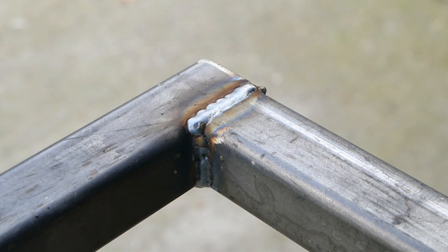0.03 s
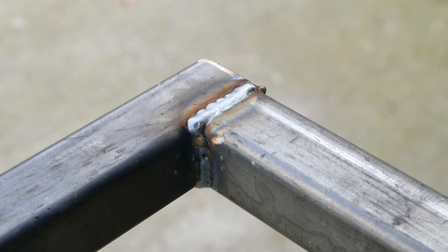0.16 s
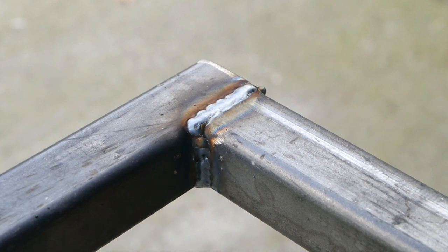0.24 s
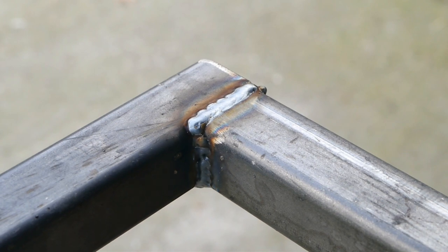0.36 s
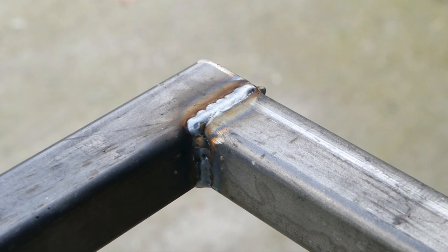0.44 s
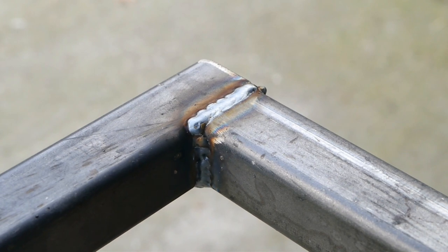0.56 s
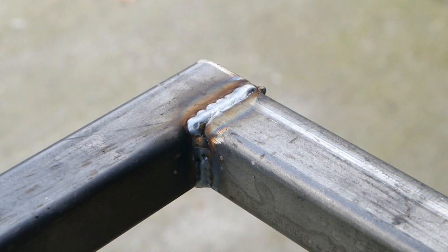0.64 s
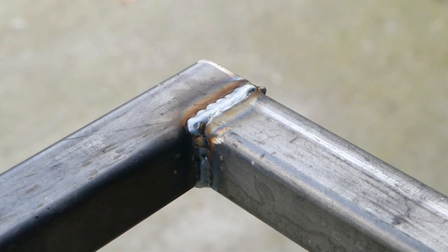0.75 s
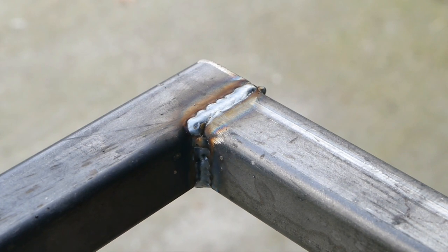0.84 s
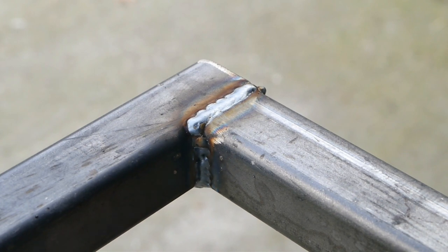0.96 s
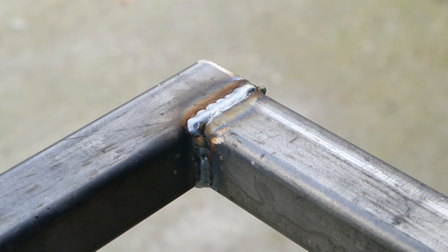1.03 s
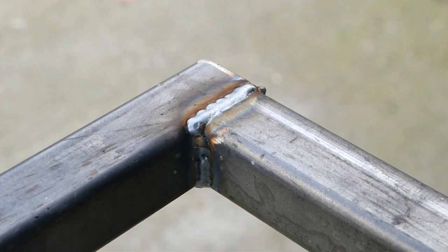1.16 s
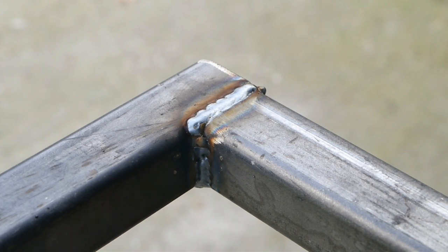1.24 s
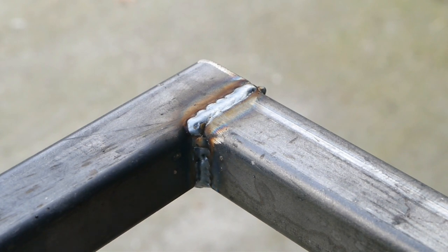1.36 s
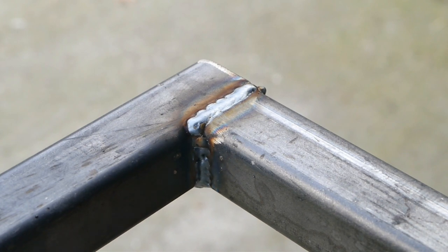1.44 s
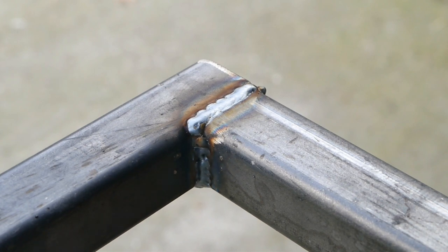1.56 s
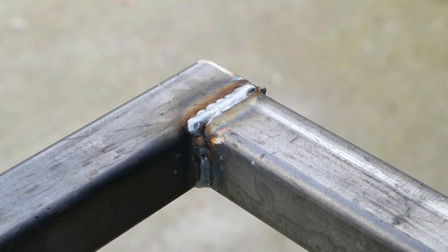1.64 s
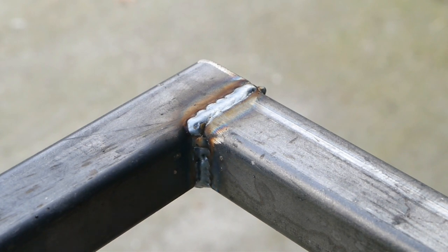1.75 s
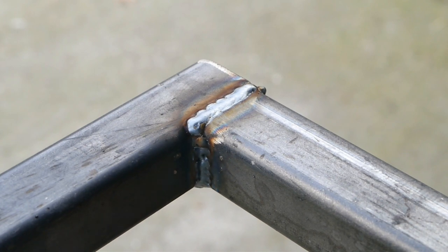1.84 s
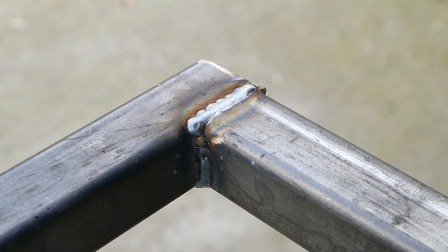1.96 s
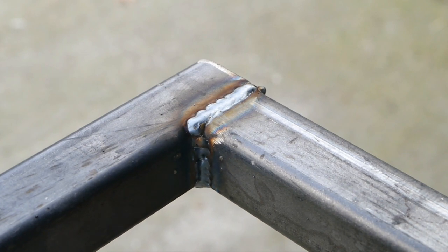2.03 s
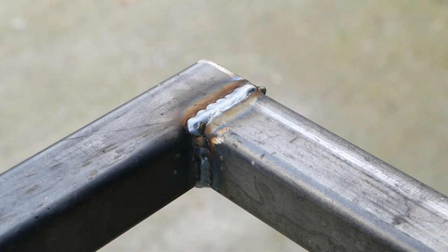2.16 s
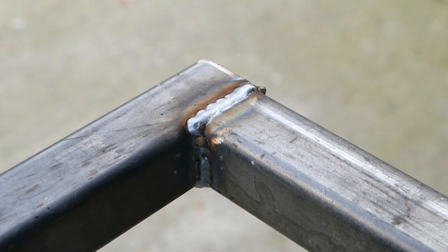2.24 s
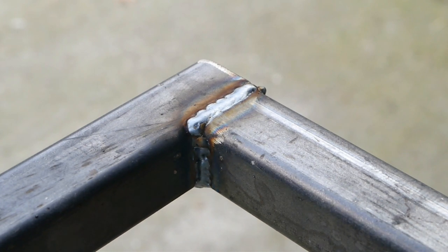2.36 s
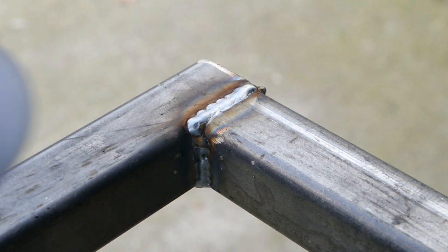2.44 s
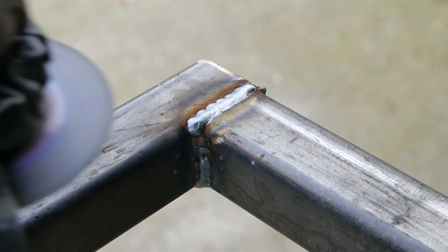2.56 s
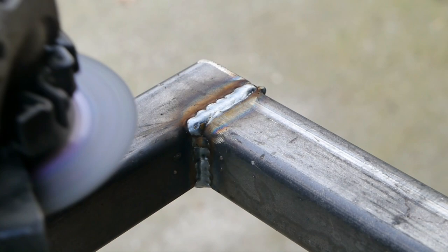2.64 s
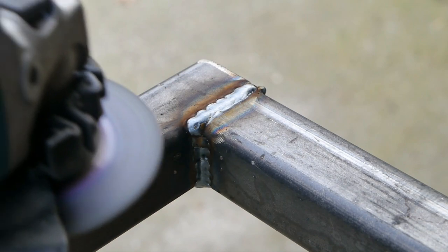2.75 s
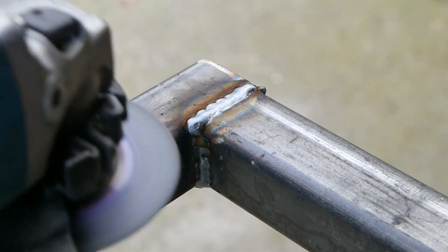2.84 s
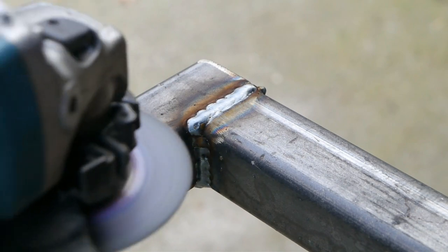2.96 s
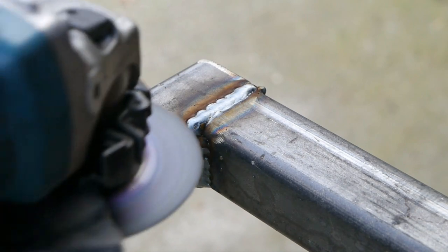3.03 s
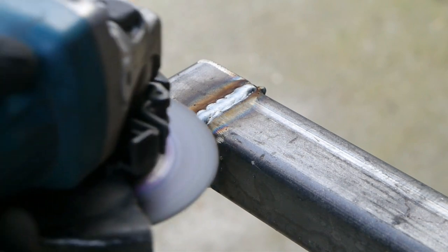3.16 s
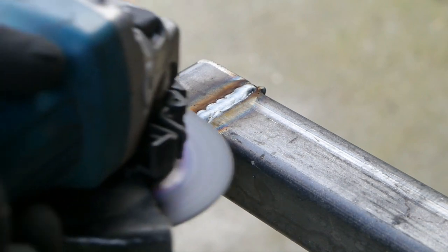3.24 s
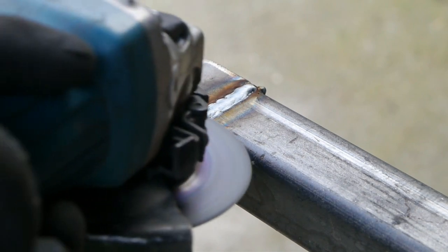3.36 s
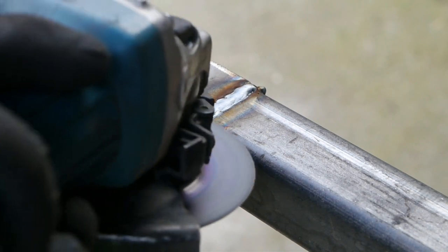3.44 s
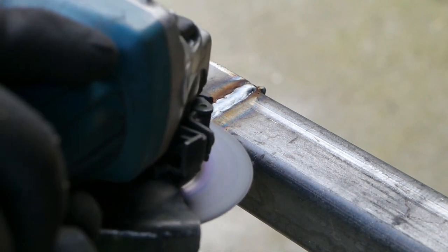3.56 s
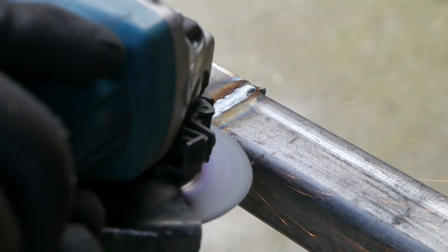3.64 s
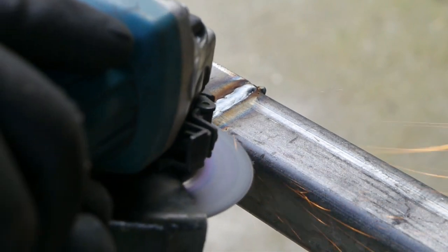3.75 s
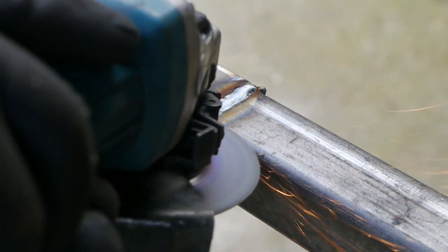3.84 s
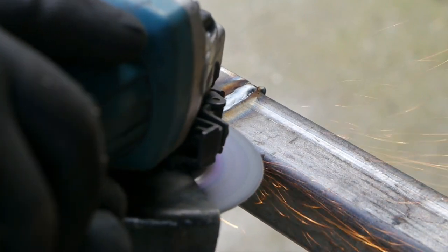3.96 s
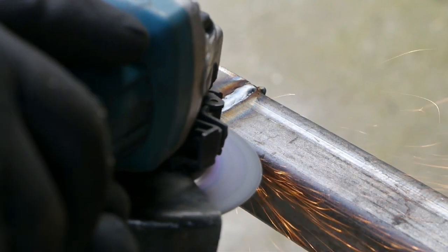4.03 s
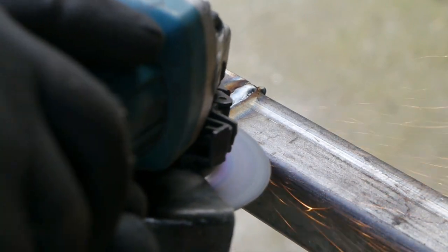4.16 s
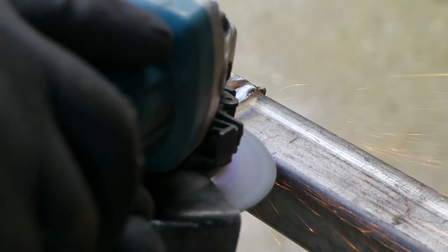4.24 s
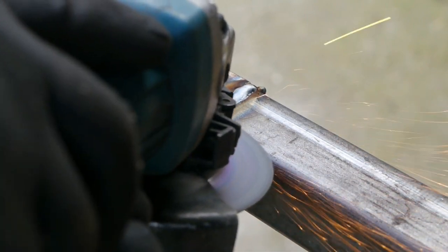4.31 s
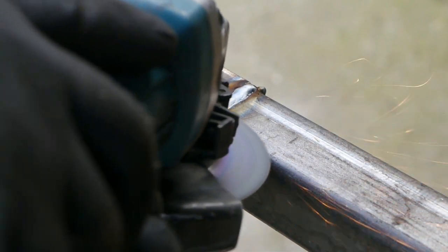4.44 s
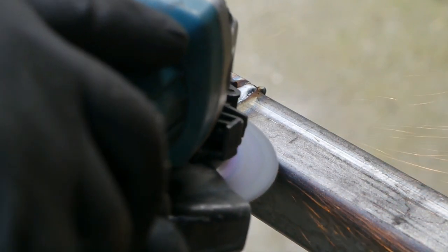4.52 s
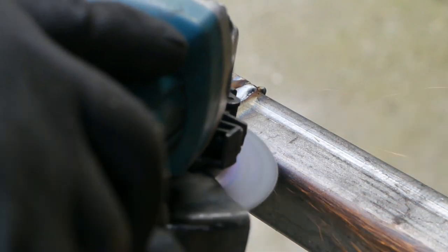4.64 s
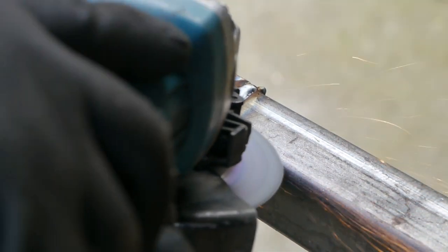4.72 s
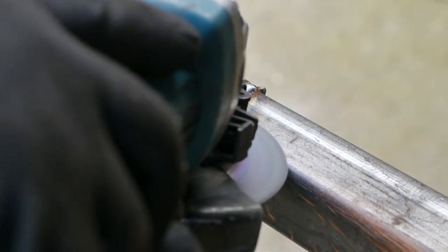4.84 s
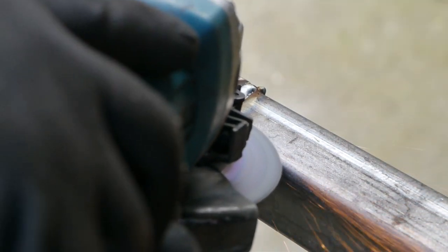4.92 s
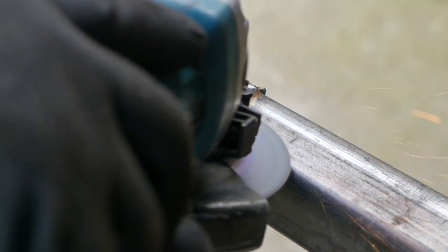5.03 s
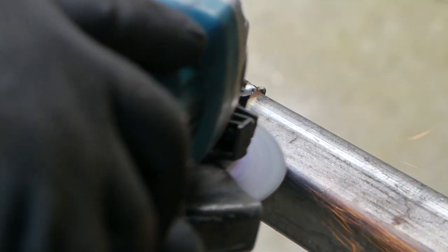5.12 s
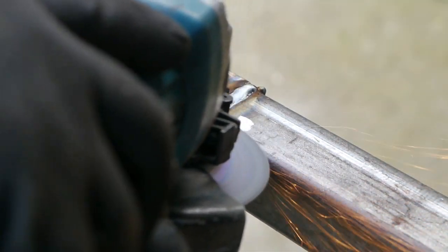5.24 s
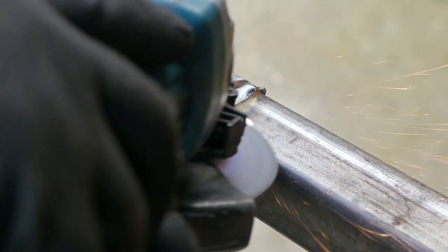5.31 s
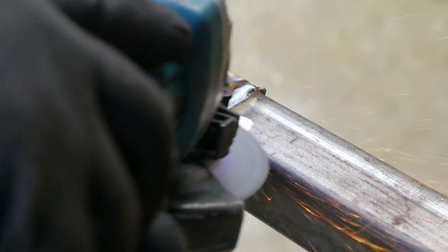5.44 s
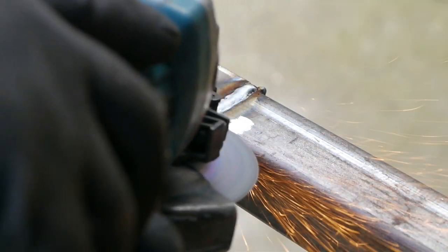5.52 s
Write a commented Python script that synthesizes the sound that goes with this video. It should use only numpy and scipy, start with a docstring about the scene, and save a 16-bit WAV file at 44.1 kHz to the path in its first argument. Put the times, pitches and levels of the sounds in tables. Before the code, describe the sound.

In a quiet open yard, an angle grinder is handled close to stereo microphones with small knocks, rubs and clicks. A sharp switch clack starts it; it jolts up into a rushing, rattling whine, then bites a steel weld with stuttering contacts and a loud, bright, sustained rasp.

```python
"""An angle grinder bites a weld bead on a steel tube: the same slowly wearing grit passes once a turn,
so the rasp is a comb of lines that sags under load, and single lines sing out as chatter.
Before that the tool is picked up with knocks, rubs and ticks, switched on, spins up and is carried to the bead.
Its fan rushes (shaped noise), its gears rattle (resonances swept by the tooth rate), its shaft hums and its
commutator whines (sines). The disc bounces before it settles. Open yard, near microphones."""
import sys
import numpy as np
from scipy import signal
from scipy.fft import rfft, irfft
from scipy.io import wavfile
from scipy.ndimage import uniform_filter1d, map_coordinates

SR = 44100
rng = np.random.default_rng(int(sys.argv[2]) if len(sys.argv) > 2 else 0)


def to_wav(s):
    """Save 16-bit WAV."""
    ch = np.atleast_2d(s).T  # columns
    pcm = np.round(np.clip(ch, -1, 1) * 32767)  # PCM
    wavfile.write(sys.argv[1], SR, pcm.astype(np.int16))


N = 246059
T = np.arange(N) / SR
GEAR_RATIO = 3.68  # motor turns per disc turn
BITE_S = 3.62  # the disc first touches the weld
# pressure on the bead: t/s, relative rasp level/dB, relative tube level against the rasp/dB
PRESSURE = [(3.79, -29, -3), (3.848, -19, -7.5), (3.878, -24.5, -9.5), (4.148, -19.5, -10),
            (4.452, -21, -8.5), (4.492, -19, -5.5), (4.526, -19, -10.5), (4.64, -20, -14.5),
            (4.68, -25, -7), (4.8, -21, -3), (4.82, -18.5, -8.5), (4.87, -23, -4), (5.098, -19.5, -4),
            (5.244, -23.5, -7), (5.322, -21, -2), (5.432, -18, -10.5), (5.538, -22, -9.5), (5.58, -18, -10)]


def undb(db):
    """Decibels to gain."""
    return 10 ** (np.asarray(db) / 20)


def unit(x):
    """Scale to rms 1."""
    return x / np.sqrt(np.mean(x ** 2))


def curves(rows):
    """The columns of a table, joined by straight lines in time."""
    s, *columns = np.transpose(rows)
    return [np.interp(T, s, c) for c in columns]


def colour(x, points):
    """Filter by a spectrum of (Hz, dB) points on a logarithmic frequency axis; rms 1."""
    hz, db = np.transpose(sorted(points))
    size = 2 ** 18
    f = np.maximum(np.fft.rfftfreq(size, 1 / SR), 1)
    gain = undb(np.interp(np.log(f), np.log(hz), db))
    return unit(irfft(rfft(x, size) * gain)[..., :N])


def resonate(x, hz, width_hz):
    """One resonance, gain 1 at its centre."""
    b, a = signal.iirpeak(min(hz, SR / 2 - 1), hz / min(width_hz, SR / 4), fs=SR)
    return signal.lfilter(b, a, x)


def ring(x, modes):
    """A set of (Hz, width Hz, dB) modes, each at its own rms level."""
    return sum(undb(db) * unit(resonate(x, hz, width)) for hz, width, db in modes)


def side_of(x, hz, kind):
    """Low or high part of a sound."""
    return signal.sosfilt(signal.butter(2, hz, kind, fs=SR, output="sos"), x)


def spread(pair, side_db, pan_db=0):
    """Two unrelated sounds as middle and side of one source; pan is left minus right."""
    mid, side = pair[0], undb(side_db) * pair[1]
    return np.array([(mid + side) * undb(pan_db / 2), (mid - side) * undb(-pan_db / 2)])


def noise(side_db, pan_db=0, split_hz=1400):
    """Stereo noise whose long waves reach both microphones nearly alike."""
    mid, side = rng.standard_normal((2, N))
    return spread([mid, side_of(side, split_hz, "high") + 0.26 * side], side_db, pan_db)


def walk(rate):
    """Smooth chance with a spread near 1; the rate is in new values per second."""
    k = max(int(SR / rate), 1)
    steps = np.repeat(rng.standard_normal(N // k + 1), k)
    return 0.86 * uniform_filter1d(uniform_filter1d(steps, k), k)[:N]


def swell(s, length):
    """A bell of peak 1 whose square is above half for the given length."""
    return 2 ** (-2 * np.minimum(((T - s) / length) ** 2, 20))


def ramp(s, length):
    """Rise from 0 to 1 around a moment."""
    return np.clip((T - s) / length + .5, 0, 1)


def place(x, pan_db):
    """Move a stereo sound left or right; only its short waves are shadowed."""
    shadow_hz = 1050  # longer waves reach both microphones alike
    low = signal.sosfiltfilt(signal.butter(2, shadow_hz, fs=SR, output="sos"), x)
    return low + (x - low) * undb(pan_db * np.array([[1], [-1]]) / 2)


def tool_pan():
    """Left minus right dB of the grinder: lifted from right to left, then carried near the middle."""
    rest_db, held_db, work_db = -4.5, 7.5, 1
    held = rest_db + (held_db - rest_db) * ramp(1, .7)
    return held + (work_db - held) * ramp(2.64, 0.85)


def yard():
    """Soft outdoor noise that swells once, with a trace of air rumbling on the microphones."""
    # outdoor spectrum: f/Hz, level/dB
    yard_spectrum = [(15, -67), (25, -23), (97, -22), (212, -19.5), (427, -8.5), (775, -8.5), (1230, -11),
                     (1330, -12.5), (1740, -13.5), (2480, -14), (8140, -21), (16000, -30.5)]
    level_db = -47.5 + 2.5 * swell(0.53, 0.42) + 0.27 * walk(17.7)
    background = undb(level_db) * colour(noise(1.6, 0.51), yard_spectrum)
    wind = colour(rng.standard_normal((2, N)), [(20, -5), (100, 10), (400, -27), (3000, -70)])
    return background + undb(-78.0) * wind


def knocks():
    """Each knock is a fast-dying crack with a faint tail; hard ones add treble, soft ones thump the body."""
    # knocks on the tool: t/s, level/dB, hardness 0 gloved bump - 1 sharp click, ring f/Hz, t60/s
    knock_list = [(.247, -33, 0.41, 1170, 0.0068), (.316, -31.5, 0.39, 1300, 0.066),
                  (.356, -31, .02, 960, 0.017), (.414, -28.5, 0.8, 2630, 0.059),
                  (.577, -39.5, 0.54, 1720, .02), (.783, -33.5, 0.62, 2600, 0.013),
                  (.988, -30.5, 0.72, 1960, 0.0086), (1.166, -28.5, 0.86, 2200, 0.024),
                  (1.366, -25, 1, 2590, .025), (1.455, -31.5, 1, 1160, .04), (1.529, -32, 1, 2800, 0.027),
                  (1.729, -36.5, 0.43, 1350, 0.013), (1.860, -27, 0.62, 840, 0.011),
                  (1.897, -12, .92, 1850, 0.011)]
    # housing modes: f/Hz, width/Hz, level/dB
    housing = [(1460, 180, -7), (2410, 320, 2), (2820, 150, -11), (4220, 170, -21), (4460, 250, -9.5),
               (5440, 370, -21), (6060, 290, -40)]
    # hollow body modes: f/Hz, width/Hz, level/dB
    hollow_body = [(264, 28, -0.5), (472, 77, 2), (654, 78, -4), (910, 90, -10)]
    soft_thump_db, hard_thump_db = 24.5, -37.5
    soft_treble_db, hard_treble_db = -51, -1
    tail_db, tail_t60_s = -16.5, 0.32
    out = np.zeros((2, N))
    age = T[:SR // 2]
    for s, db, hardness, ring_hz, t60 in knock_list:
        thump_db = soft_thump_db + hardness * (hard_thump_db - soft_thump_db)
        treble_db = soft_treble_db + hardness * (hard_treble_db - soft_treble_db)
        grain = spread(rng.standard_normal((2, len(age))), -0.43)
        decay = undb(-60 * age / t60) + undb(tail_db - 60 * age / tail_t60_s)
        blow = grain * decay
        crack = undb(-2.0) * unit(side_of(side_of(blow, 710, "high"), 2400, "low"))
        rings = undb(-8.5) * ring(blow, housing) + undb(-4) * unit(resonate(blow, ring_hz, 420))
        thump = undb(thump_db) * side_of(ring(blow.mean(0), hollow_body), 300, "high")
        treble = undb(treble_db) * unit(resonate(blow, 5560, 410))
        # the contact is too soft to reach the top octave
        soften = signal.butter(3, 7000, fs=SR, output="sos")
        hit = signal.sosfilt(soften, crack + rings + thump + treble)
        hit = hit / hit[:, :SR // 100].std(axis=1, keepdims=True)  # level of the first 10 ms
        start = int(s * SR)
        out[:, start:start + len(age)] += hit * undb(db)
    return out


def rubs_and_ticks():
    """Rubs and tiny bright ticks while the tool is handled: short bursts of grainy noise around one pitch."""
    # rubs and ticks: t/s, length/s, level/dB, centre f/Hz
    burst_list = [(0.108, 0.019, -50, 129), (0.266, 0.0018, -38, 9000), (0.269, 0.031, -41.5, 630),
                  (0.372, 0.028, -37, 520), (0.578, .002, -35, 10000), (0.635, 0.045, -54, 5000),
                  (.805, 0.023, -49, 8000), (1.001, 0.015, -32.5, 11000), (1.063, 0.21, -48.5, 4500),
                  (1.594, 0.072, -55.5, 151), (1.749, 0.039, -40.5, 4830), (1.843, .013, -36, 1760),
                  (1.876, 0.036, -26.5, 5470)]
    out = np.zeros((2, N))
    grainy = side_of(noise(-5) * undb(6 * walk(300)), 18000, "low")
    for s, length, db, hz in burst_list:
        band = [(hz / 8, -50), (hz / 2, -9), (hz, 0), (hz * 2, -9), (hz * 8, -40)]
        out += undb(db) * swell(s, length) * colour(grainy, band)
    return out


def handling():
    """Knocks, rubs and ticks move across the stereo image with the tool in the hands."""
    return place(knocks() + rubs_and_ticks(), tool_pan())


def motor_speed():
    """Armature turns per second: a quick, then creeping run-up, then the speed that the load allows."""
    # disc speed, sagging under load: t/s, turns per second f/Hz
    disc_speed = [(4.008, 169.4), (4.55, 163.6), (5.292, 160.4), (5.58, 158.4)]
    power_on_s, half_speed_after_s = 1.85, .165
    top_speed_hz = 688.4  # approached, never quite reached
    age = np.maximum(T - power_on_s, 1e-4)
    disc_hz, = curves(disc_speed)
    return np.minimum(top_speed_hz * age / (age + half_speed_after_s), disc_hz * GEAR_RATIO)


def fan_rush(speed, bite, near_db, surge_db):
    """Fan noise through vents and guard; a faster fan is louder, and its finest hiss comes last."""
    # fan noise spectrum: f/Hz, level/dB
    fan_spectrum = [(59, -66), (100, -32.5), (234, -31), (406, -14.5), (608, -9), (721, -14.5), (950, -2.5),
                    (1580, -1), (2170, -3), (2580, -1), (3780, -3.5), (5650, -3), (11900, -7),
                    (13200, -9.5), (16000, -22.5)]
    # modes of the vents and guard: f/Hz, width/Hz, level/dB
    vents = [(736, 63, -13.5), (820, 180, -30.5), (1420, 850, -32), (1835, 160, -31.5), (2960, 140, -25),
             (4370, 640, -21), (5680, 1000, -19.5), (6950, 190, -28.5)]
    octaves = np.log2(speed)
    air = colour(noise(-8.5, split_hz=1600) * undb(0.68 * walk(250)), fan_spectrum)
    air = air + ring(air, vents)
    low = unit(side_of(air, 7100, "low"))
    high = unit(side_of(air, 4120, "high"))
    # the treble opens with speed, and yields to the surge and the nearness of the tube
    free_treble_db = 4 + 1.5 * octaves - near_db - surge_db
    treble_db = (1 - bite) * free_treble_db - 3 * bite
    rush = undb(-1.28) * low - undb(treble_db) * high
    body = signal.sosfiltfilt(signal.butter(2, 8500, fs=SR, output="sos"), rush)
    return body + undb(9.5 * octaves) * (rush - body)


def shaft_hum(turn, speed, bite):
    """Unbalance of the shaft hums once per motor turn, stronger with speed and weaker under load."""
    level = undb(-18 - 3.7 * bite + 3.8 * walk(15)) * speed ** 0.39 * ramp(2.04, 0.2)
    return level * np.sin(turn + 0.37 * walk(30.2))


def commutator_whine(turn, motor_hz):
    """Commutator bars whine; the tone flares as it sweeps through one resonance."""
    bars, resonance_hz, width_hz = 32, 12400, 530
    flare = 1 / np.hypot(1, 2 * (bars * motor_hz - resonance_hz) / width_hz)
    return flare * undb(-18.5 + 2.0 * walk(160)) * np.sin(bars * turn + 0.65 * walk(350))


def gear_rattle(motor_hz):
    """Teeth strike unevenly; each gear case mode rings while a harmonic of the tooth rate sweeps past it."""
    # gear case modes: f/Hz, width of each of two filter passes/Hz, level/dB, exciting tooth-rate harmonic
    gear_modes = [(1797, 170, -20, 1), (3120, 400, -23.5, 1), (5730, 1400, -24, 2), (9430, 1500, -24.5, 3)]
    pinion_teeth, reach_octaves = 10, .3
    rattle = noise(-1.5) * undb(1.8 * walk(120))
    out = 0
    for hz, width, db, harmonic in gear_modes:
        octaves_off = np.log2(harmonic * pinion_teeth * motor_hz / hz)
        nearness = 1 / (1 + (octaves_off / reach_octaves) ** 4)
        mode = unit(resonate(resonate(rattle, hz, width), hz, width))
        out = out + undb(db) * nearness * mode
    return out


def machine(motor_hz):
    """Fan rush, gear rattle, shaft hum and commutator whine; the rush falls back once the disc bites."""
    gears_engage_s = 1.899  # the gears take up their slack
    turn = 2 * np.pi * np.cumsum(motor_hz) / SR
    speed = motor_hz / motor_hz.max()
    bite = ramp(BITE_S, 0.019)
    surge_db = 4.5 * swell(1.963, 0.14)  # extra rush under starting current
    near_db = 2 * swell(3.64, 0.57)  # the rush grows close to the tube
    _, tube_db = curves(PRESSURE)
    free_db = -23.5 + 3.5 * np.log2(speed) + surge_db + near_db
    # under load the rush follows the tube
    loaded_db = -35 + 0.98 * (tube_db - tube_db[T > BITE_S].mean())
    gain = undb((1 - bite) * free_db + bite * loaded_db)
    # the starting current shakes the gears, and the rush and hum, twice in each mains cycle
    shake = 1 + 0.62 * swell(1.85, 0.25) * np.cos(2 * np.pi * 100 * (T - gears_engage_s))
    air_and_hum = fan_rush(speed, bite, near_db, surge_db) + shaft_hum(turn, speed, bite)
    running = shake * gain * air_and_hum + shake * gear_rattle(motor_hz)
    running = running + commutator_whine(turn, motor_hz)
    return place(ramp(gears_engage_s, 0.0021) * running, tool_pan() * (1 - bite))


def grit(turns, memory, size_db, count=272):
    """Grains round the rim strike once a turn; on each turn wear swaps some of them for new ones."""
    shape = (int(turns[-1]) + 2, count)
    fresh = rng.standard_normal(shape) * undb(size_db * rng.standard_normal(shape))
    broken = rng.random(shape) > memory
    # the turn on which each present grain came to the surface
    born = np.maximum.accumulate(broken * np.arange(shape[0])[:, None], axis=0)
    rim = np.take_along_axis(fresh, born, axis=0)
    return unit(map_coordinates(rim.ravel(), [turns * count], order=3, mode="nearest"))


def chatter_tone(turns, multiple):
    """The disc skips a whole number of times a turn: one multiple of its speed, fluttering and wavering."""
    wander_turns = 0.0021 * walk(70)
    phase = 2 * np.pi * multiple * (turns + wander_turns) + rng.normal(0, 0.4, (2, 1))
    return unit(undb(3 * walk(55))) * np.sin(phase)


def chatter(turns):
    """A few tones of the skipping disc sing out; more come and go faintly, mostly on the bead's crest."""
    # the loudest chatter tones: t/s, length/s, multiple of the disc speed, level/dB
    loud_tones = [(3.865, 0.21, 27, -32), (4.04, 0.41, 59, -28), (4.152, 0.36, 47, -31),
                  (4.196, 0.19, 8, -40.5), (4.22, 0.4, 39, -28.5), (4.42, 0.11, 26, -32),
                  (4.445, 0.13, 12, -30.5), (4.45, 0.12, 27, -31), (4.468, 0.11, 16, -33.5),
                  (4.469, 0.19, 13, -34.5), (4.516, 0.44, 10, -37.5), (5.0, .32, 15, -36),
                  (5.167, 0.14, 23, -26.5), (5.295, 0.2, 8, -38.5), (5.478, 0.099, 28, -28),
                  (5.565, 0.15, 23, -30.5)]
    faint = sum(undb(4 * walk(6)) * chatter_tone(turns, k) for k in range(8, 29))
    loud = sum(undb(db) * swell(s, length) * chatter_tone(turns, k) for s, length, k, db in loud_tones)
    faint_db = -52.5 + 4.5 * swell(4.3, 0.16)
    return loud + faint * ramp(3.97, 0.3) * undb(faint_db)


def rim_strikes(turns):
    """Recurring grit and random chips strike the bead, pressed harder by an uneven, wavy disc."""
    angle = 2 * np.pi * turns
    # the contact point wanders on the rim, which blurs the high lines most
    contact = turns + 0.0015 * walk(90)
    grains = spread([grit(contact, memory=.9, size_db=5.0) for _ in range(2)], -9.5, -0.82)
    # chips tear off at random; they rule until the disc has settled
    chips = unit(noise(-10.5) * undb(4.3 * walk(5000)))
    chips_db = 2.06 - 6.04 * ramp(3.96, 0.18) + 2.9 * ramp(3.9, 0.098)
    strikes = grains + undb(chips_db) * chips
    # the disc is not flat: it presses harder once a turn and on the waves of its rim
    lobes = np.cos(angle) + np.cos(7 * angle) + np.cos(8 * angle)
    return strikes * undb(1.14 * lobes + 0.6 * walk(70))


def grinding(disc_hz):
    """Grit rasps the bead and rings the tube; the colour shifts as the contact slides along the weld."""
    # rasp spectra before and after the slide, then the tube spectrum: f/Hz, level/dB
    early_spectrum = [(2500, -29), (4200, -11), (4600, -2), (5200, -7.5), (6600, -1.5), (7200, -5),
                      (7900, -3), (8500, -2), (10100, -4.5), (11600, -1.5), (12350, 3), (14000, -14.5),
                      (14900, -20), (16000, -4)]
    late_spectrum = [(2500, -32), (4500, 0.5), (5500, -3), (6600, 5), (7400, 1), (8400, 7), (9500, 4),
                     (10800, 8), (11700, -1), (12500, 10.5), (13600, -5), (14400, -11), (15100, -2),
                     (16000, 2)]
    tube_spectrum = [(500, -40), (1000, -6), (1350, -9.5), (2300, 5), (2800, 0.5), (3600, -2),
                     (4300, -12.5), (6000, -7.5)]
    # modes of the tube and of the disc: f/Hz, width/Hz, level/dB
    tube_modes = [(1330, 210, -16.5), (2376, 20, -15), (3220, 300, -11), (3584, 32, -8), (4555, 120, -11),
                  (5900, 63, -10.5), (13100, 280, -28)]
    disc_modes = [(6800, 180, -16.5), (7880, 210, -13.5), (9170, 200, -11.5), (10080, 260, -7),
                  (12600, 220, -15), (14850, 260, -16.5)]
    # disc bouncing on the bead: t/s, length/s, level/dB
    bounce_list = [(3.615, 0.005, -11.5), (3.638, 0.0067, -23.5), (3.665, 0.0035, -24),
                   (3.735, 0.011, -20.5), (3.753, 0.0054, -23), (3.777, 0.0055, -22.5)]
    turns = np.cumsum(disc_hz * (T > 3.5)) / SR  # counted from just before contact
    rasp_db, tube_db = curves(PRESSURE)
    strikes = rim_strikes(turns)
    slide = ramp(4.72, 0.3)
    early = undb(-2.0) * colour(strikes, early_spectrum)
    late = undb(0.5) * colour(strikes, late_spectrum)
    # on the crest of the bead the light touch makes the disc itself screech
    screech = undb(-2.5) * ring(strikes, disc_modes)
    rasp = side_of((1 - slide) * (early + screech) + slide * late, 1100, "high")
    tube = side_of(colour(strikes, tube_spectrum) + ring(strikes, tube_modes), 1100, "high")
    # the disc springs back after the first bite
    rebound_db = -5 * swell(3.70, 0.036)
    cut = undb(rasp_db - 0.82) * (undb(rebound_db) * rasp + undb(tube_db - 1.76) * tube)
    bounces = rasp * sum(undb(db) * swell(s, length) for s, length, db in bounce_list)
    return ramp(BITE_S, .01) * (cut + chatter(turns)) + bounces


def scene():
    """One shaft speed drives the motor and, through the bevel gear, the disc."""
    motor_hz = motor_speed()
    return yard() + handling() + machine(motor_hz) + grinding(motor_hz / GEAR_RATIO)


def record(dry):
    """The recorder clips the highest peaks and cuts the top."""
    top_hz = 15700
    lowpass = signal.ellip(10, .2, 80, top_hz, fs=SR, output="sos")
    return signal.sosfilt(lowpass, np.clip(dry, -.85, .85))


dry = scene()
out = record(dry)
to_wav(out)
```